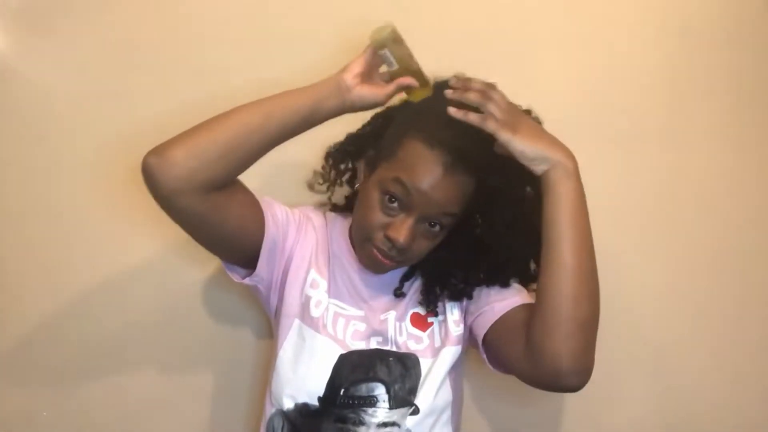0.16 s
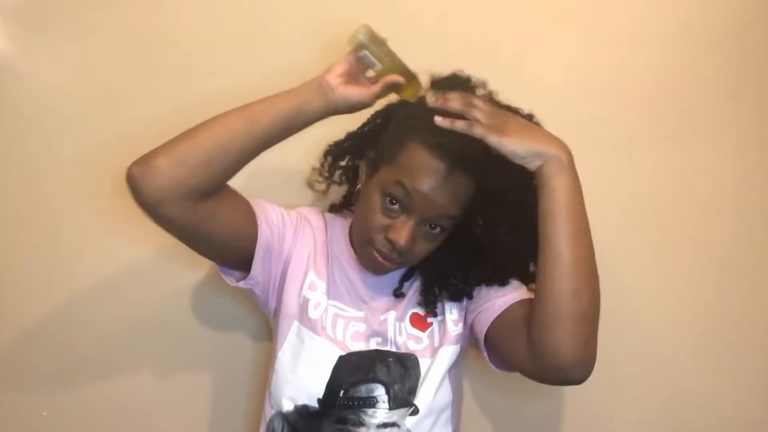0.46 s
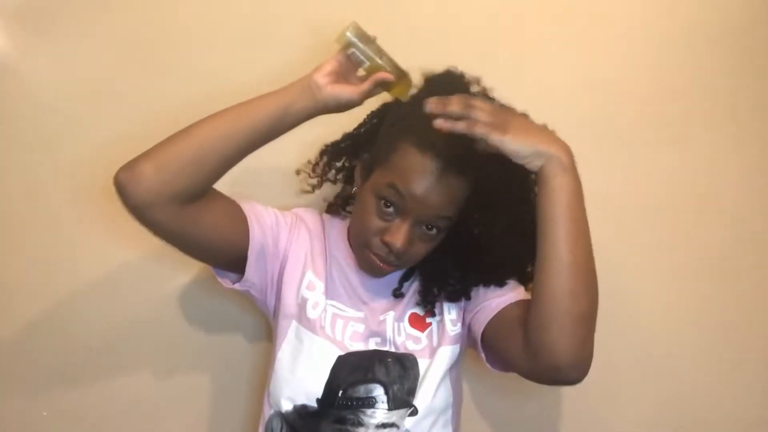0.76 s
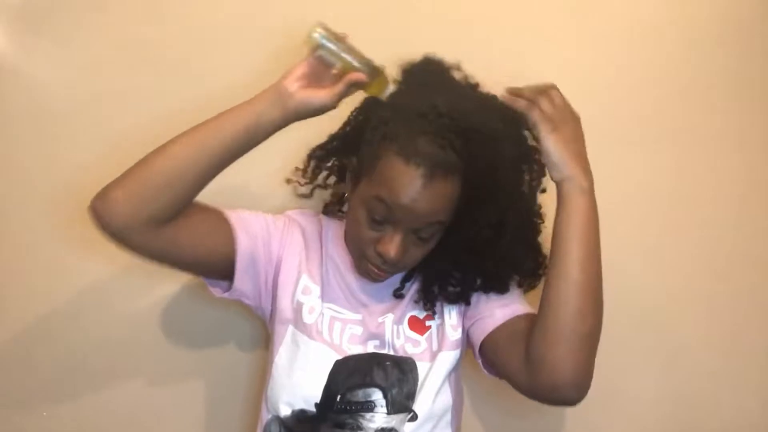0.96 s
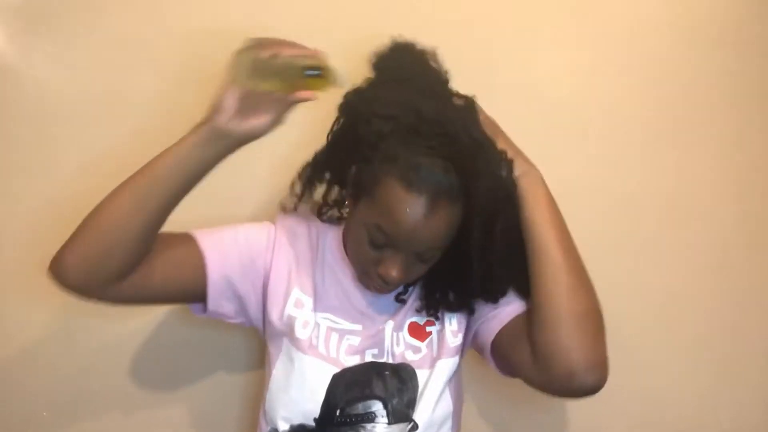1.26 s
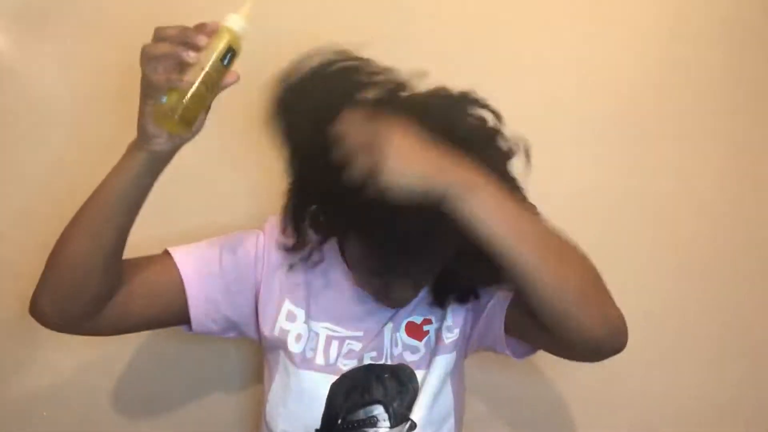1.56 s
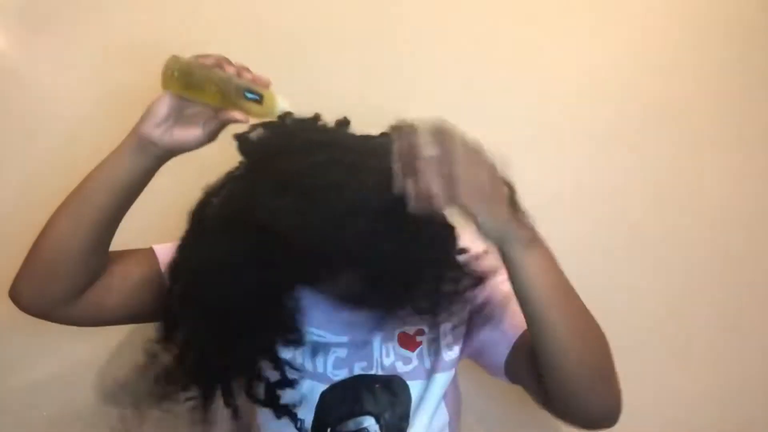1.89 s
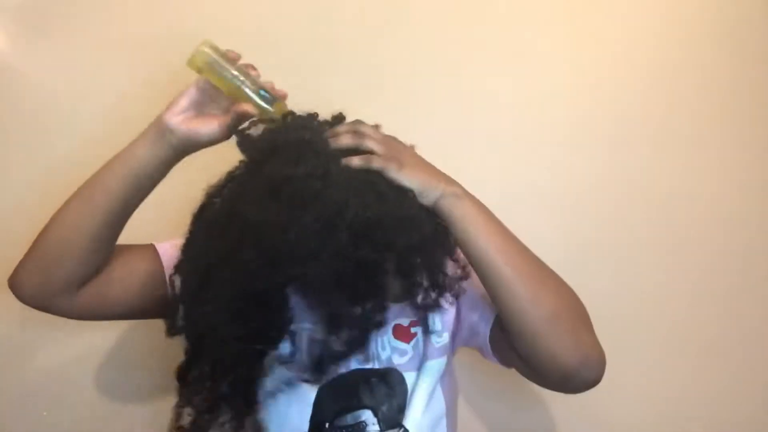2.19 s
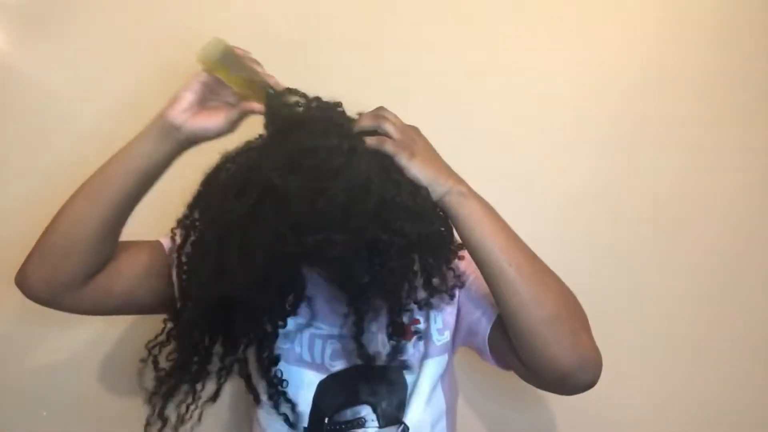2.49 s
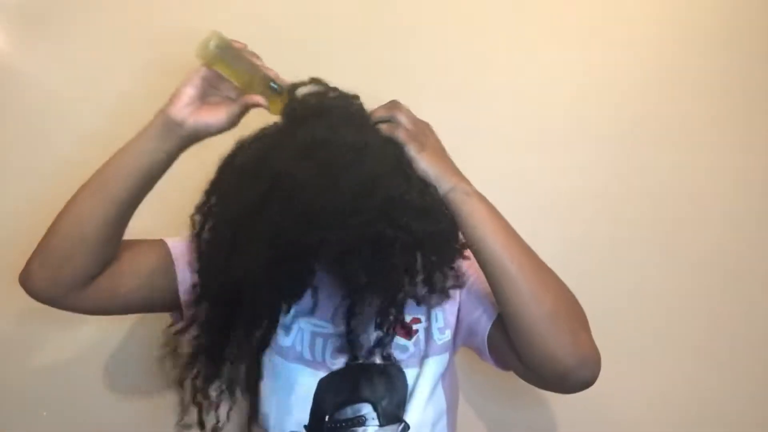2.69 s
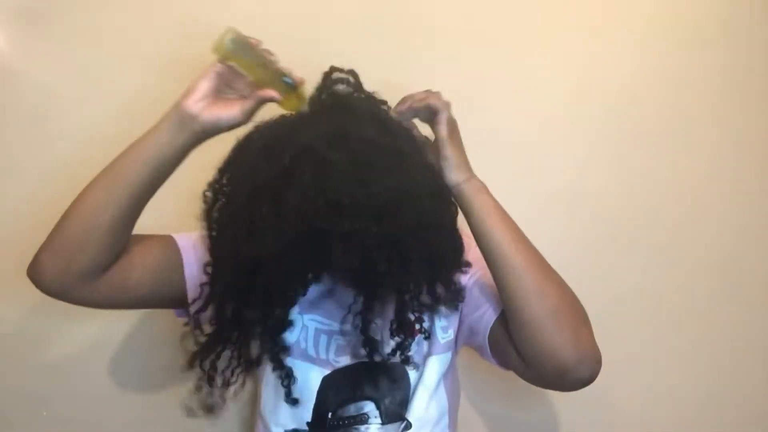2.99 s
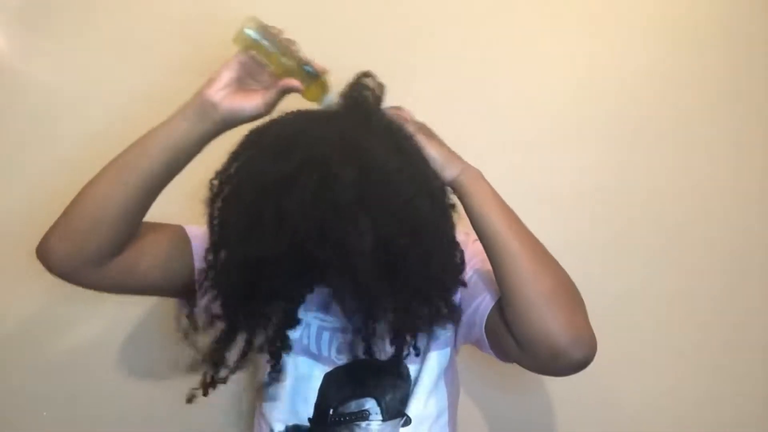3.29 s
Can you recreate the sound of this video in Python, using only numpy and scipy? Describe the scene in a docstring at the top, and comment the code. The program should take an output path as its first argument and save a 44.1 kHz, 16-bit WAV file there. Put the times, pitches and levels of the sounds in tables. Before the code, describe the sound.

Soft hair rustling under rubbing fingers, plastic bottle clicks and tiny nozzle pops, quiet humming room.

```python
"""In a quiet room, fingertips rub through thick curly hair while a small plastic oil bottle is dabbed on the scalp.
Ventilation rumbles as shaped noise, narrow resonances and a faint steady hum.
Hair rustles as dense random slips of strands, swelling and fading with each finger stroke.
Plastic and nails tick as clicks with dying scuffs; air pops in the nozzle as short hollow notes.
Ticks and pops leave a short, dull echo."""
import sys
import numpy as np
from scipy import signal
from scipy.fft import rfft, irfft
from scipy.io import wavfile

SR = 44100
rng = np.random.default_rng(int(sys.argv[2]) if len(sys.argv) > 2 else 0)


def wrap_up_sound(samples):
    """Save the sound to the file named by the first command line argument, as 16-bit audio."""
    columns = np.atleast_2d(samples).T
    # keep every value between -1 and 1, then stretch to whole-number steps
    tamed = np.clip(columns, -1, 1)
    steps = np.round(tamed * 32767).astype(np.int16)
    wavfile.write(sys.argv[1], SR, steps)


def amplitude_ratio(level_db):
    """Convert a level in decibels to the matching linear amplitude (field) ratio."""
    exponent = np.asarray(level_db, float) / 20
    return 10 ** exponent


N = 152145  # length in samples


def rms_one(x):
    """Scale a sound to an rms of 1."""
    return x / np.sqrt(np.mean(x ** 2) + 1e-20)


def coloured(x, spectrum):
    """Filter a noise by a spectrum table, joined up along log pitch; rms 1."""
    hz, db = np.transpose(spectrum)
    bins_hz = np.fft.rfftfreq(N, 1 / SR) + 1  # +1 keeps the log finite
    gain = amplitude_ratio(np.interp(np.log(bins_hz), np.log(hz), db))
    return rms_one(irfft(rfft(x) * gain, N))


def drift(rate_hz):
    """Random wander of rms 1: noise through two equal one-pole low-passes."""
    r = np.exp(-2 * np.pi * rate_hz / SR)
    wander = signal.lfilter([1], [1, -2 * r, r * r], rng.standard_normal(N + SR))
    return rms_one(wander[SR:])  # the first second only settles the filter


def low_pass(x, hz):
    """Keep what lies below a pitch, without delay."""
    return signal.sosfiltfilt(signal.butter(2, hz, fs=SR, output="sos"), x)


def band_pass(x, edges_hz):
    """Let a sound ring in one band."""
    return signal.sosfilt(signal.butter(2, edges_hz, "band", fs=SR, output="sos"), x)


def add(out, start_s, sound):
    """Mix a short sound in at its start time."""
    i = int(start_s * SR)
    out[i:i + len(sound)] += sound[:N - i]


# Spectrum of the broad room tone: pitch_hz [Hz], relative_level_db [dB per Hz]
ROOM_TONE_SPECTRUM = [(15, -75), (32, -64), (50, -15), (66, -9), (116, -2), (194, -13), (340, -19),
                      (437, -27), (570, -28.5), (710, -33.5), (1100, -37), (1500, -50), (2500, -46.5),
                      (5200, -48), (7800, -51.5), (8400, -55), (15800, -55.5)]
# Ventilation resonances and hum: pitch_hz [Hz], width_hz [Hz], level_db [dB rms]
VENT_RESONANCES = [(82.95, 2.3, -53), (118.9, 6.8, -51), (147.3, 21, -56), (170.5, 6.2, -57.5),
                   (222, 30, -60.5), (289.9, 20, -63), (326.7, 12.7, -62.5), (356.7, 7.1, -64.5),
                   (477.6, 0.69, -65), (8950, 1.5, -109)]


def ventilation():
    """Broad room tone, a steady motor tone, and noise ringing in narrow resonances."""
    air_db, flicker_db, flicker_hz = -47, 2.34, 5.8
    motor_hz, motor_db = 485.3, -62.5
    air = coloured(rng.standard_normal(N), ROOM_TONE_SPECTRUM)
    out = air * amplitude_ratio(air_db + flicker_db * drift(flicker_hz))
    out += amplitude_ratio(motor_db) * np.sin(2 * np.pi * motor_hz * np.arange(N) / SR)
    white = rng.standard_normal((len(VENT_RESONANCES), N + SR))
    for (pitch_hz, width_hz, level_db), noise in zip(VENT_RESONANCES, white):
        r = np.exp(-np.pi * width_hz / SR)
        resonator = [1, -2 * r * np.cos(2 * np.pi * pitch_hz / SR), r * r]
        ringing = signal.lfilter([1, 0, -1], resonator, noise)[SR:]
        out += amplitude_ratio(level_db) * rms_one(ringing)
    return out


STRAND_HZ = np.geomspace(500, 16000, 11)  # band edges; each slip rings in one of these bands


def strand_slips():
    """Random clicks of uneven size and either sign, each ringing in one randomly dealt band."""
    slips_per_s, spread_db = 26000, 2.7
    sizes_db = spread_db * np.minimum(rng.exponential(1, N), 5)
    sizes = amplitude_ratio(sizes_db) * rng.choice([-1, 1], N)
    sizes = sizes * (rng.random(N) < slips_per_s / SR)
    bands = len(STRAND_HZ) - 1
    dealt = rng.integers(0, bands, N)
    rings = np.zeros(N)
    for k in range(bands):
        rings += band_pass(sizes * (dealt == k) + 1e-18, STRAND_HZ[k:k + 2])
    return rings


# Spectrum of the strand rustle: pitch_hz [Hz], relative_level_db [dB per Hz]
HAIR_SPECTRUM = [(600, -40), (950, -26), (1230, 2), (1450, -14), (1800, -2), (2300, 1.5), (2750, 1),
                 (3400, -8), (4100, -7.5), (4700, -7.5), (5800, -12.5), (7700, -12.5), (8600, -15.5),
                 (15500, -24)]
# Finger strokes through the hair: peak_s [s], swell_s [s], fade_s [s],
# level_db [dB], brightness_db [dB, treble above the tilt pitch relative to the stroke level]
FINGER_STROKES = [(.08, 0.023, 0.035, -67, -1), (.35, 0.028, 0.025, -64.5, -2),
                  (.455, 0.02, 0.016, -62.5, -1), (.565, 0.019, 0.021, -63, -7),
                  (.68, 0.03, 0.026, -65.5, 3), (.79, 0.0091, 0.015, -65, 0), (.91, 0.03, 0.019, -62, -2.5),
                  (1.0, 0.053, 0.04, -64.5, -9), (1.215, 0.017, 0.019, -55, -9.5),
                  (1.36, 0.059, 0.075, -77, 15), (1.51, 0.042, 0.029, -63, 5),
                  (1.62, 0.038, 0.073, -72.5, 9.5), (1.78, 0.077, 0.073, -73.5, 6.5),
                  (2.11, 0.029, 0.022, -65, 2.5), (2.2, 0.021, 0.038, -59, -5),
                  (2.4, 0.054, 0.041, -63, -12), (2.465, 0.036, 0.031, -54, -5.5),
                  (2.7, 0.072, 0.074, -62, -5), (2.81, 0.019, 0.055, -63.5, -5),
                  (2.885, 0.021, 0.029, -56.5, -6.5), (2.96, 0.024, 0.057, -57, -7),
                  (3.005, 0.031, 0.015, -54.5, -6), (3.05, 0.018, 0.011, -59.5, -7),
                  (3.109, 0.018, 0.046, -58, -9), (3.225, 0.014, 0.033, -53.5, -8),
                  (3.27, 0.017, 0.028, -57.5, -7), (3.38, 0.026, 0.03, -63, -3), (3.445, .02, .03, -88, -2)]


def hair():
    """Strands slip in clumps and catches; bell-shaped strokes drive body and treble separately."""
    clump_db, clump_hz = 0.5, 31.0
    catch_db, catch_hz = 1.0, 190.0
    tilt_hz = 3700
    light_hz, light_db = 1980, -65.5  # softer strokes lose their body below this pitch
    t = np.arange(N) / SR
    unevenness = amplitude_ratio(clump_db * drift(clump_hz) + catch_db * drift(catch_hz))
    slips = coloured(strand_slips(), HAIR_SPECTRUM) * unevenness
    below_tilt = low_pass(slips, tilt_hz)
    deep = low_pass(slips, light_hz)
    body, bright = np.zeros((2, N))
    for peak_s, swell_s, fade_s, level_db, brightness_db in FINGER_STROKES:
        side_s = np.where(t < peak_s, swell_s, fade_s)
        stroke = amplitude_ratio(level_db) * np.exp(-.5 * ((t - peak_s) / side_s) ** 2)
        body = np.hypot(body, stroke)
        bright = np.hypot(bright, stroke * amplitude_ratio(brightness_db))
    weight = body / np.hypot(body, amplitude_ratio(light_db))  # near 1 for firm strokes, 0 for light ones
    return (below_tilt - deep * (1 - weight)) * body + (slips - below_tilt) * bright


# Plastic and nail ticks, a row for each band that rings: start_s [s], peak_db [dB],
# centre_hz [Hz], width_octaves [octaves, at least 0.1 is played], scuff_t60_s [s]
TICK_BANDS = [(1.2957, -43, 6770, 0.22, 0.022), (1.2961, -38, 3700, 1.2, 0.0061),
              (1.3024, -34.5, 3150, 0.79, 0.0078), (1.3045, -45, 3630, 0.13, 0.021),
              (1.305, -51, 6800, 0.29, .012), (1.307, -37.5, 2660, 0.41, .01),
              (1.309, -49.5, 1780, 0.23, 0.059), (1.307, -48.5, 1320, .2, .03),
              (1.308, -51, 930, 0.11, 0.034), (1.4664, -34.5, 6800, 0.43, 0.0079),
              (1.4683, -36.5, 4100, .6, 0.016), (1.466, -38, 1300, .7, 0.019),
              (1.468, -44.5, 12000, 1.1, 0.017), (1.467, -36.5, 2800, .2, 0.015),
              (1.4687, -39.5, 1650, 0.41, .025), (1.4749, -38, 3700, .5, 0.024),
              (1.481, -41, 2920, 0.37, .015), (1.488, -38.5, 5500, .9, .008), (1.487, -56, 12600, .8, .01),
              (1.49, -43, 7600, 0.12, 0.0051), (1.4925, -46, 4900, 0.17, 0.015),
              (1.4982, -44.5, 3340, 0.34, .012), (1.505, -51, 3400, .3, 0.065),
              (1.526, -52, 3180, .3, 0.073), (1.612, -45, 1490, 1.2, 0.0094),
              (2.1441, -40, 4400, 1.1, 0.0085), (2.145, -46, 11500, 1.5, 0.012),
              (2.145, -33.5, 810, 2.1, 0.019), (2.1459, -24, 2040, 0.45, 0.0084),
              (2.1458, -35.5, 4600, 0.25, 0.014), (2.1465, -46, 7200, .15, 0.021),
              (2.146, -37, 2700, 0.1, 0.011), (2.147, -39.5, 3370, 0.13, 0.0098),
              (2.154, -41, 4800, 1.2, 0.012), (2.154, -55, 2400, .5, 0.011),
              (2.1759, -38, 3800, 1.05, .008), (2.179, -52, 2400, 0.72, 0.049),
              (2.179, -42, 7360, 0.28, .007), (2.179, -46, 11900, 0.78, .02),
              (2.188, -49, 6200, 0.46, .008), (2.286, -37.5, 2270, 1.03, 0.006),
              (2.2872, -42.5, 646, 0.87, 0.017), (2.883, -50, 2130, 0.29, 0.012),
              (3, -38.5, 2080, 0.56, 0.044)]


def ticks():
    """Each tick is a click with a rough dying scuff, both ringing in one band."""
    scuff_db, rise_db_per_octave, rise_hz = -17.0, 5.0, 3000  # scuffs grow above rise_hz
    out, t = np.zeros(N), np.arange(SR // 10) / SR
    scuffs = rng.standard_normal((len(TICK_BANDS), len(t)))
    for (start_s, peak_db, centre_hz, octaves, t60_s), scuff in zip(TICK_BANDS, scuffs):
        half_octaves = np.array([-.5, .5]) * max(octaves, .1)
        edges_hz = np.clip(centre_hz * 2.0 ** half_octaves, 50, 18000)
        rise_db = rise_db_per_octave * max(np.log2(centre_hz / rise_hz), 0)
        dying_scuff = scuff * amplitude_ratio(scuff_db + rise_db - 60 * t / t60_s)
        tick = band_pass((t == 0) + dying_scuff, edges_hz)
        add(out, start_s, amplitude_ratio(peak_db) * tick / np.abs(tick).max())
    return out


# Air popping in the nozzle: start_s [s], level_db [dB], pitch_hz [Hz], swell_s [s],
# t60_s [s, after the swell], overtones_db [dB, added to the partials above twice the pitch]
NOZZLE_POPS = [(1.612, -45, 1298, 0.0041, 0.0098, -25), (2.144, -43.5, 1217, 0.002, 0.02, -20),
               (2.178, -46, 1143, 0.0018, 0.046, -13), (2.2865, -40, 883, 0.0016, 0.013, -25),
               (2.2872, -40.5, 1090, 0.0019, 0.026, 4.5), (2.311, -51, 1080, 0.0027, 0.0086, -15)]
# Partials of the nozzle: multiple [times pitch], level_db [dB], glide [fraction of pitch per s]
NOZZLE_PARTIALS = [(1, 2.5, -0.5), (2.95, -16.5, 9), (5.5, -30, 2), (7.2, -29, 0)]


def pops():
    """Hollow tube notes with gliding overtones; they swell, flutter and die ever faster."""
    flutter_db, flutter_hz = 2.6, 150.0
    out, t = np.zeros(N), np.arange(SR // 5) / SR
    for start_s, level_db, pitch_hz, swell_s, t60_s, overtones_db in NOZZLE_POPS:
        note = np.zeros(len(t))
        for multiple, partial_db, glide in NOZZLE_PARTIALS:
            cycles = pitch_hz * multiple * (t + .5 * glide * t ** 2)
            note += amplitude_ratio(partial_db + overtones_db * (multiple > 2)) * np.sin(2 * np.pi * cycles)
        dying = amplitude_ratio(level_db - 60 * (np.maximum(t - swell_s, 0) / t60_s) ** 2)
        swelling = np.minimum(t / swell_s, 1)
        add(out, start_s, note * dying * swelling)
    return out * amplitude_ratio(flutter_db * drift(flutter_hz))


def room(x):
    """Diffuse echo: low-passed noise dying away after a gap of 4 ms."""
    t60_s, wall_cut_hz = 0.26, 8700
    t = np.arange(SR // 2) / SR
    pole = np.exp(-2 * np.pi * wall_cut_hz / SR)
    dull_noise = signal.lfilter([1], [1, -pole], rng.standard_normal(len(t)))
    tail = dull_noise * amplitude_ratio(-60 * t / t60_s) * (t > .004)
    return signal.fftconvolve(x, tail / np.sqrt(np.sum(tail ** 2)))[:N]


def scene():
    """Ventilation, hair and bottle together; only ticks and pops feed the echo."""
    tick_send_db, pop_send_db = -12, -16
    air, rustle = ventilation(), hair()
    hard, hollow = ticks(), pops()
    echo = room(amplitude_ratio(tick_send_db) * hard + amplitude_ratio(pop_send_db) * hollow)
    return (air + rustle + hard + hollow + echo)[None]


def roll_off(x):
    """The treble ends steeply here."""
    return signal.sosfilt(signal.butter(12, 16460, fs=SR, output="sos"), x)


def record(dry):
    """A small microphone: a gentle bottom cut and a steep top cut."""
    low_cut_hz, top_cut_hz = 32, 16200  # the top is 50 dB down from top_cut_hz up
    bottom_cut = signal.butter(2, low_cut_hz, "high", fs=SR, output="sos")
    top_cut = signal.cheby2(14, 50, top_cut_hz, fs=SR, output="sos")
    mix = signal.sosfilt(top_cut, signal.sosfilt(bottom_cut, dry))
    return roll_off(mix)


dry = scene()
out = record(dry)
wrap_up_sound(out)
```